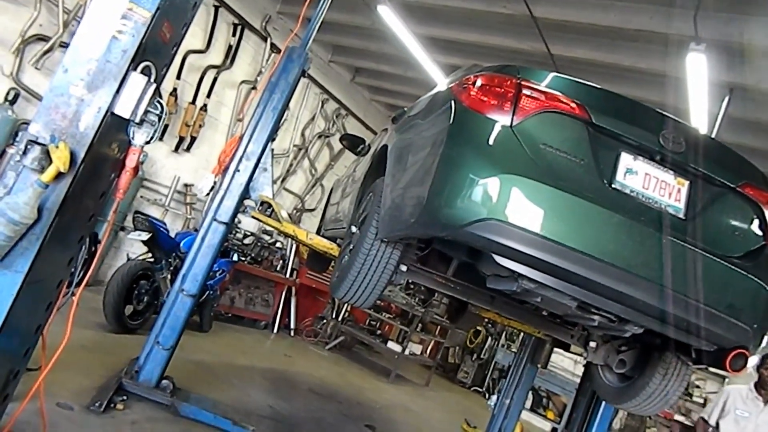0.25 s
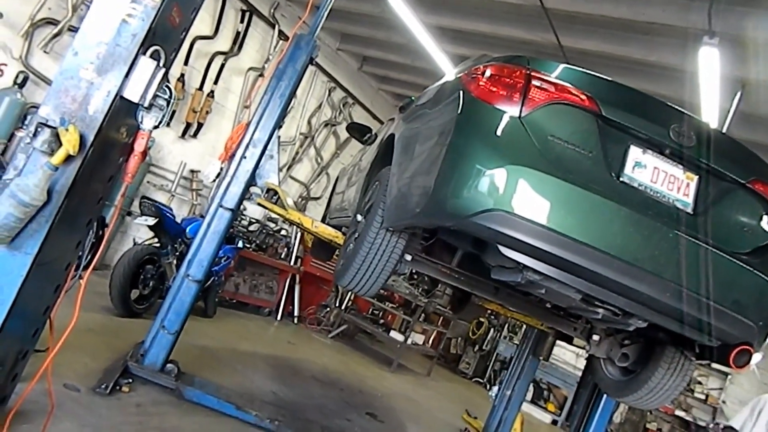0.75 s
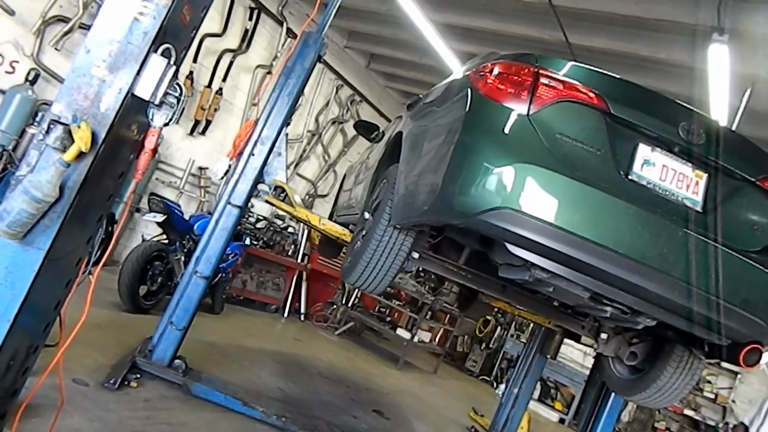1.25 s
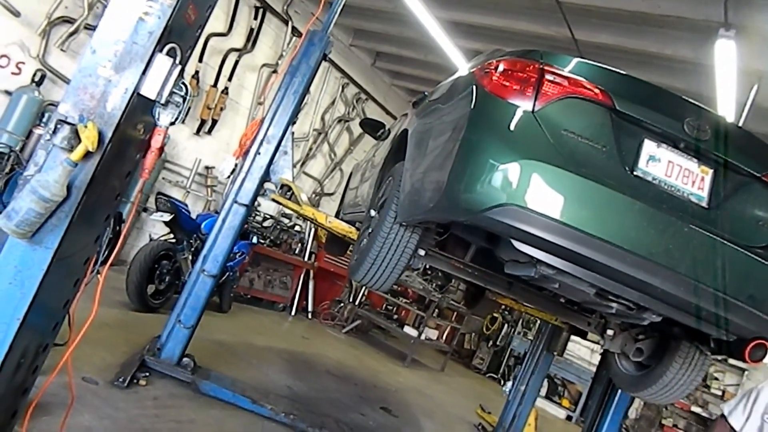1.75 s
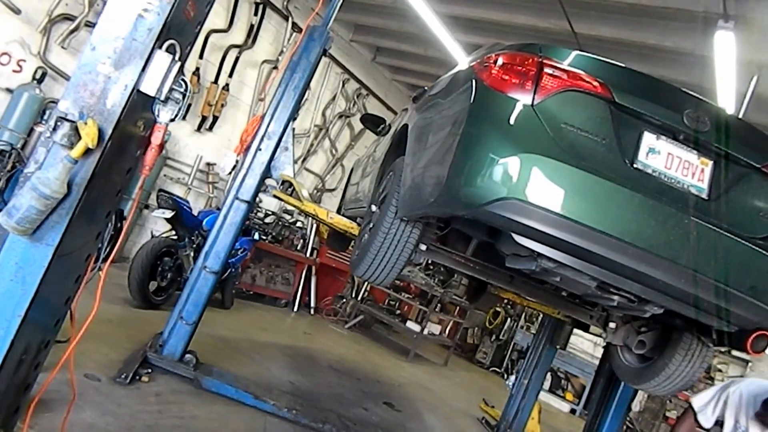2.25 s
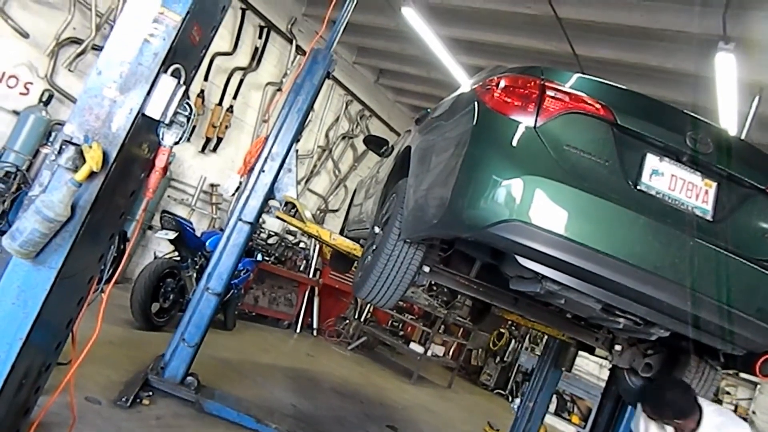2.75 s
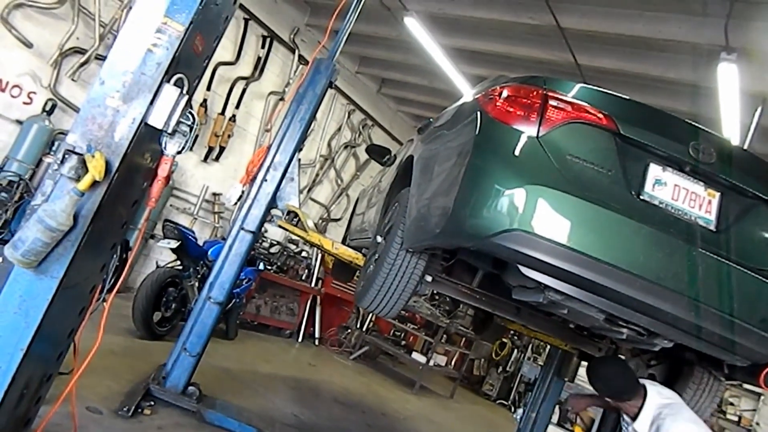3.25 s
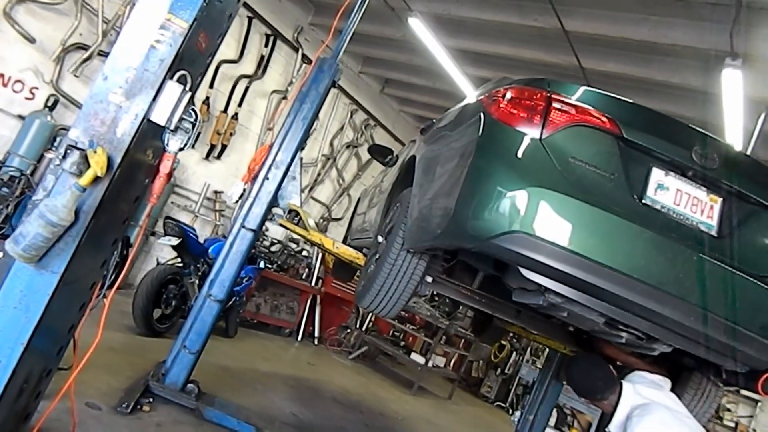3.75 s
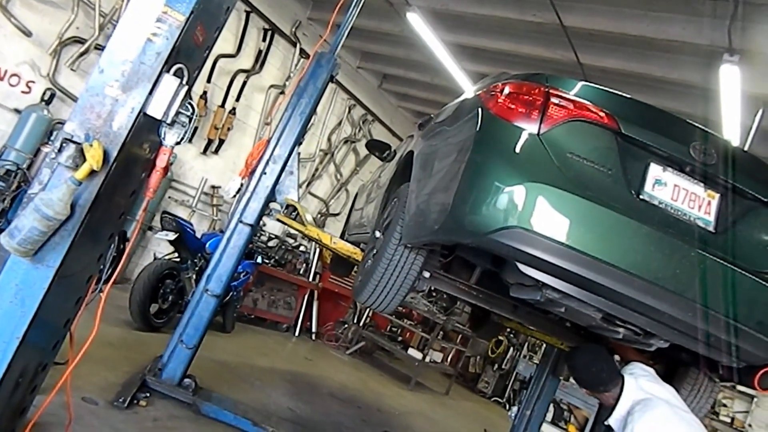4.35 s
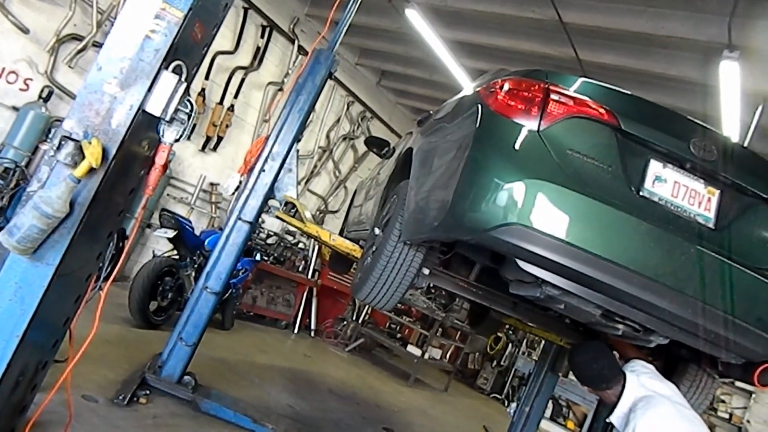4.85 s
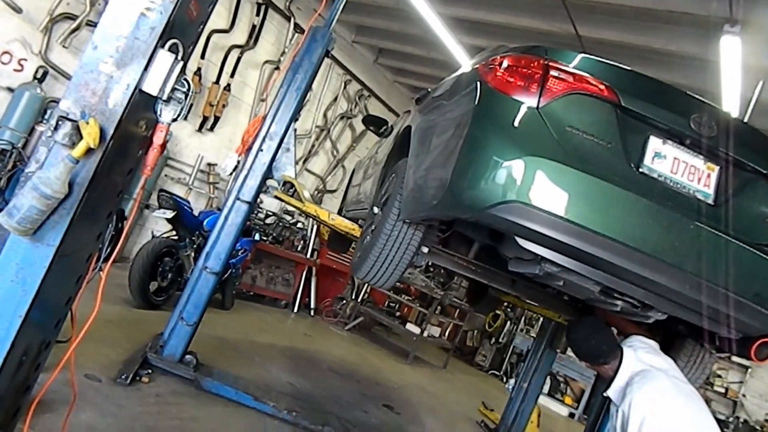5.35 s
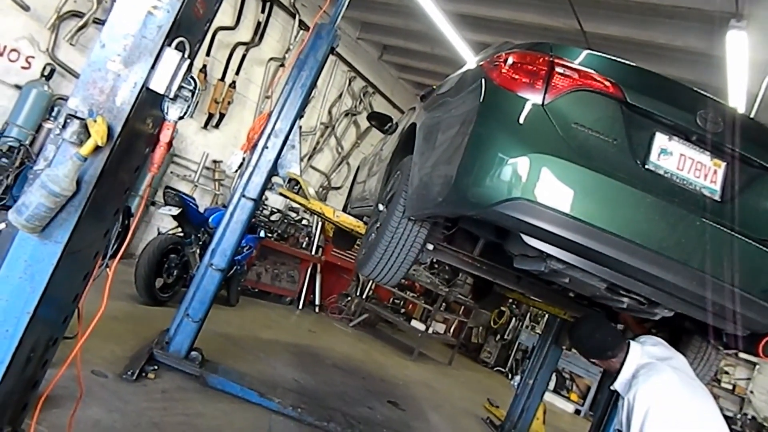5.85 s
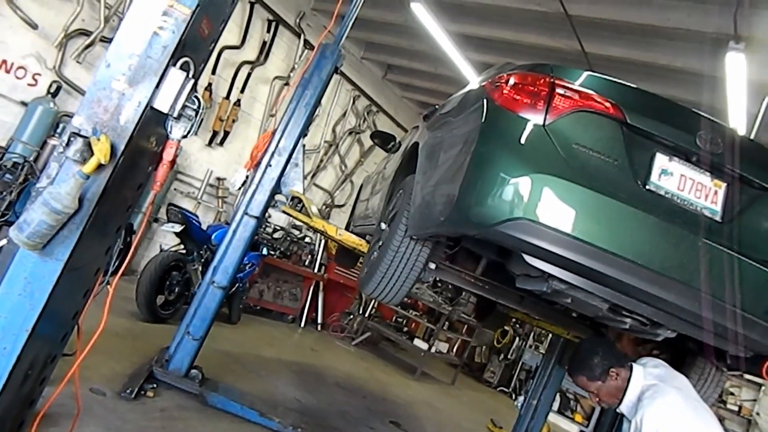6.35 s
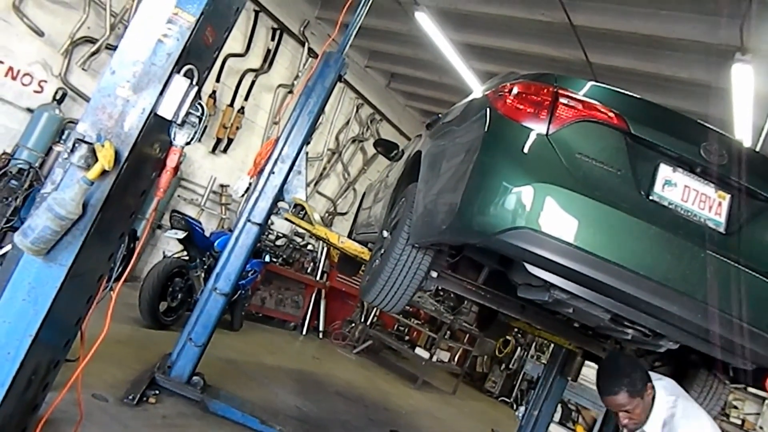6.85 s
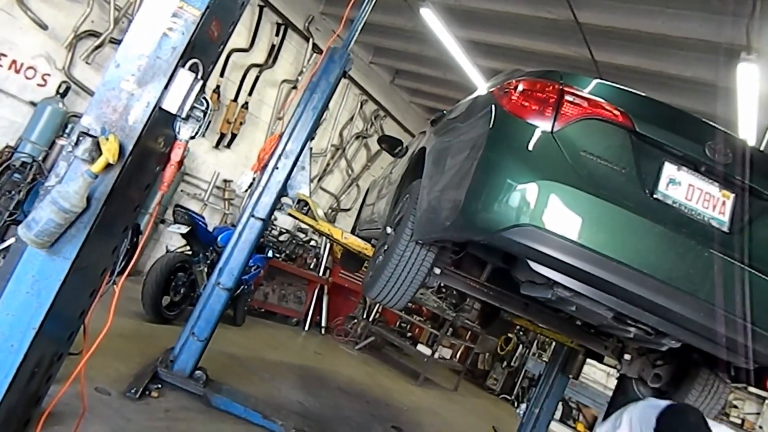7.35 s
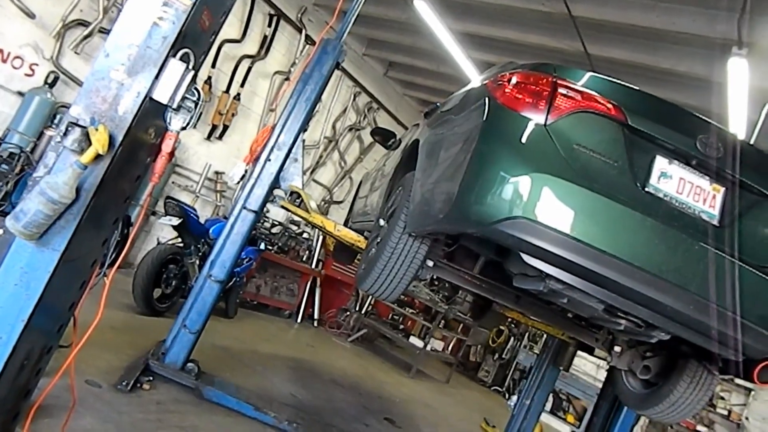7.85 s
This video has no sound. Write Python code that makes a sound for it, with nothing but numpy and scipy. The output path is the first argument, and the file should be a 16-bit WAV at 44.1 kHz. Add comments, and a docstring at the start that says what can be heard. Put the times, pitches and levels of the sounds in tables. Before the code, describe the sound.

Close stereo pickup behind a car on a lift: deep, throbbing, unmuffled idle with low notes swelling in the boom and a breathy rush of escaping gas that eases and bursts back. The idle slows, then recovers somewhat. Finally the engine stumbles, thumps and crackles, revs to over twice its speed with a barking tone, and begins coasting down in the workshop's reverberation.

```python
"""A four-cylinder car on a workshop lift drones through an open exhaust at a raised idle that sinks and recovers.
One cylinder hits hardest: its orders slide through the resonances of pipe and room, excited by firing pulses.
Gas, made of filtered noise, rushes and hisses, eases off and spurts again; low notes swell in the drone.
Near the end the throttle opens: the engine stumbles, thumps and clicks and revs up while the hiss dies away.
With the opposite cylinder now firing almost as hard, it starts to fall back."""
import sys
import numpy as np
from scipy import signal
from scipy.fft import rfft, irfft
from scipy.io import wavfile
from scipy.ndimage import uniform_filter1d, minimum_filter1d

SR = 44100
rng = np.random.default_rng(int(sys.argv[2]) if len(sys.argv) > 2 else 0)


def unload_wav(signal):
    """Save mono or channel-first audio to the path in sys.argv[1] as 16-bit WAV at rate SR, clipped to [-1, 1]."""
    wavfile.write(
        sys.argv[1],
        SR,
        np.round(np.clip(np.atleast_2d(signal).T, -1, 1) * 32767).astype(np.int16),
    )


N = 357246
T = np.arange(N) / SR
HZ = np.fft.rfftfreq(N, 1 / SR)


def amp(db):
    """Logarithmic level: decibels become an amplitude gain."""
    return 10 ** (np.asarray(db) / 20)


def curves(rows):
    """Linear interpolation: each column after the time becomes a curve over time."""
    s, *columns = np.transpose(rows)
    return [np.interp(T, s, column) for column in columns]


def read(points):
    """Logarithmic pitch scale: a table over frequency is joined on a log axis."""
    hz, value = np.transpose(points)
    return np.interp(np.log(HZ + 1), np.log(hz + 1), value)


def ramp(start_s, length_s):
    """Linear transition: rises from 0 to 1."""
    return np.clip((T - start_s) / length_s, 0, 1)


def bell(s, half_length_s):
    """Gaussian envelope: swells to 1 at s and falls to 1/e a half length away."""
    return np.exp(-((T - s) / half_length_s) ** 2)


def swells(rows):
    """Superposition of Gaussian swells: one summed curve for each dB column."""
    return sum(np.outer(db, bell(s, half_length)) for s, half_length, *db in rows)


def unit(x):
    """Normalisation of power: scales to rms 1."""
    return x / np.sqrt(np.mean(x ** 2) + 1e-20)


def held(x, size=6000):
    """Short-time power normalisation: rms stays near 1, but the throb of single firings remains."""
    power = uniform_filter1d(uniform_filter1d(x ** 2, size), size)
    return x / np.sqrt(abs(power) + 1e-20)


def wander(hz):
    """Low-passed random process: slow chance of rms 1, up to about hz."""
    return unit(irfft(rfft(rng.standard_normal(N)) / (1 + (HZ / hz) ** 4), N))


def band(x, lo_hz, hi_hz, order=4):
    """Band-pass filtering: a Butterworth response passes lo_hz to hi_hz."""
    sos = signal.butter(order, [lo_hz, min(hi_hz, .49 * SR)], "band", fs=SR, output="sos")
    return signal.sosfilt(sos, x)


def workshop(x, t60=1.0):
    """Diffuse reverberation: exponentially decaying noise, independent at each microphone."""
    t = np.arange(SR) / SR
    tail = rng.standard_normal((2, SR)) * amp(-60 * t / t60) * (t > .006)
    return signal.fftconvolve(x[None], tail / np.linalg.norm(tail[0]), axes=1)[:, :N]


def rumble():
    """Partly coherent ambient noise: low workshop air, mostly shared by the two microphones."""
    common, left, right = band(rng.standard_normal((3, N)), 53, 91, order=2)
    pair = unit(common + .45 * np.array([left, right]))
    return amp(-34.5) * pair


# Low notes in the drone. Each row: centre in seconds, half length in seconds, pitch in Hz, mean level in dB.
LOW_NOTES = [(0, 0.099, 114, -25), (0.625, 0.075, 145.6, -16), (2.313, 0.6, 121.5, -28),
             (2.892, 0.21, 119.6, -19), (5.503, 0.31, 133.4, -21)]


def hum():
    """Amplitude and phase modulation: sine tones swell, fade and waver a little."""
    drift_rad = 0.72 * wander(0.75)
    notes = np.zeros(N)
    for s, half_length, hz, db in LOW_NOTES:
        notes += amp(db) * bell(s, half_length) * np.sin(2 * np.pi * hz * T + drift_rad)
    return np.sqrt(2) * amp(2.8 * wander(3.1)) * notes  # root 2 brings a sine to rms 1


# Short howls and whistles in the gas stream. Each row: centre in seconds, half length in seconds,
# pitch in Hz, width in Hz, level in dB, left minus right in dB.
WHISTLES = [(3.413, 0.11, 1220, 400, -28, 0), (6.94, 0.032, 2330, 200, -33.5, -6),
            (7.042, 0.037, 2570, 220, -36, -5), (7.3, 0.38, 2510, 450, -43.5, -7),
            (7.55, 0.059, 2600, 500, -44, -8), (7.54, 0.037, 1060, 500, -34, 1)]


def howls():
    """Resonant filtering: noise caught briefly in a resonance is heard as a fuzzy whistle."""
    out = np.zeros((2, N))
    for s, half_length, hz, width, db, pan_db in WHISTLES:
        resonance = 1 / (1 + (2 * (HZ - hz) / width) ** 2)
        tone = unit(irfft(rfft(rng.standard_normal(N)) * resonance, N))
        out += tone * bell(s, half_length) * amp([[db + pan_db / 2], [db - pan_db / 2]])
    return out


# Likeness of the two microphones. Each row: frequency in Hz, coherence 0-1.
COHERENCE = [(300, .98), (1000, .93), (2000, .8), (3000, .55), (4500, .25), (14000, .25)]
# Balance of the two microphones. Each row: frequency in Hz, left minus right in dB.
BALANCE = [(300, 1), (1000, -0.5), (2000, -2), (4000, -6.5), (6500, -8.5), (9000, -2), (13000, 1.5)]


def gas(colour, ripple_db):
    """Partial coherence: turbulent noise with a fixed, randomly rippled spectrum, partly alike at the microphones."""
    a, b = rfft(rng.standard_normal((2, N)))
    ripple = unit(uniform_filter1d(rng.standard_normal(len(HZ)), size=140))
    same, balance_db = read(COHERENCE), read(BALANCE)
    left = a * amp(balance_db / 2)
    right = (same * a + np.sqrt(1 - same ** 2) * b) * amp(-balance_db / 2)
    pair = irfft(np.array([left, right]) * amp(read(colour) + ripple_db * ripple), N)
    return pair / pair.mean(0).std()


def gusty(x, patchy_db):
    """Intermittency of turbulence: eddies swell and fade in patches a few hundred Hz wide."""
    z = signal.stft(x, nperseg=512)[2]
    chance = rng.standard_normal(z.shape[1:])
    patches = unit(uniform_filter1d(uniform_filter1d(chance, size=4, axis=0), size=9, axis=1))
    return signal.istft(z * amp(patchy_db * patches), nperseg=512)[1][:, :N]


# The gas eases off, then breaks out again. Each row: start in seconds, end in seconds, depth for the sizzle in dB.
EASINGS = [(1.4, 1.767, 6), (2.587, 3.65, 12.5), (5.307, 5.76, 14.5)]
EASE_S, BREAK_OUT_S = 0.26, .04
HISS_FOLLOWS = 0.46  # share of the sizzle's dips that the hiss takes
# Spurts of gas. Each row: centre in seconds, half length in seconds, hiss change in dB, sizzle change in dB.
GAS_SPURTS = [(.42, 0.19, 2.5, 6.5), (1.06, .07, 3.5, 0), (1.8, 0.038, -2, 4), (2.03, 0.088, 1, 2.5),
              (2.5, 0.31, 1, 2.5), (3.4, 0.086, 4, -3), (3.68, 0.035, -0.5, 5), (4.03, 0.27, 3.5, 6.5),
              (4.53, 0.11, 4, 6), (4.73, 0.13, 2, 2.5), (5.17, 0.11, 4.5, 6.5), (5.8, 0.054, -0.5, 10),
              (6.16, 0.099, 2, 4.5), (7.9, 0.18, 5.5, 10)]
# The hiss dies away after the throttle opens: delay in seconds, time constant in seconds,
# final hiss change in dB, final sizzle change in dB.
FADE_UNDER_THROTTLE = (0.11, 0.17, -16.5, -25)
HISS_DB, SIZZLE_DB = -32.5, -45.5  # escaping gas at idle


def flow():
    """Modulated flow noise: hiss and sizzle dB are steady but for lulls and spurts, then decay away."""
    lull_db = np.zeros(N)
    for start, end, depth in EASINGS:
        lull_db += depth * ramp(start, EASE_S) * (1 - ramp(end - BREAK_OUT_S / 2, BREAK_OUT_S))
    hiss_db, sizzle_db = swells(GAS_SPURTS)
    delay, fade, hiss_drop_db, sizzle_drop_db = FADE_UNDER_THROTTLE
    gone = 1 - np.exp(-np.maximum(T - OPEN_S - delay, 0) / fade)
    return (HISS_DB + hiss_db - HISS_FOLLOWS * lull_db + hiss_drop_db * gone,
            SIZZLE_DB + sizzle_db - lull_db + sizzle_drop_db * gone)


# Spectra of the three gas noises. Each row: frequency in Hz, relative spectral level in dB.
ROAR_COLOUR = [(150, -12), (280, 0), (400, 1), (580, -1), (800, -1), (1000, 0), (1250, -2), (1500, -9.5),
               (1900, -8), (2600, -18), (3600, -25), (6000, -50), (12000, -92)]
HISS_COLOUR = [(700, -24), (1500, 9), (2200, 4.5), (3000, 1.5), (4200, -2.5), (6500, -4.5), (8000, -9.5),
               (10000, -14.5), (14000, -47)]
SIZZLE_COLOUR = [(5000, -9.5), (7500, 2.5), (9000, 4), (11800, 5.5), (12800, -1.5), (13800, -6),
                 (14600, -17)]


def rush(pulses):
    """Pulsating jet noise: gas leaves in puffs as a roar, and a hiss and fine sizzle that flutter together."""
    _, _, roar_db = blast()
    hiss_db, sizzle_db = flow()
    puffs = unit(band(abs(pulses), 18, 160, order=1))
    roar_gain = amp(roar_db + 2.1 + .5 * puffs + .5 * wander(25))
    roar = gusty(gas(ROAR_COLOUR, ripple_db=2.5), patchy_db=1.5) * roar_gain
    flutter_db = 0.44 * puffs + 0.44 * wander(23)
    hiss = gusty(gas(HISS_COLOUR, ripple_db=1.7), patchy_db=1.2) * amp(hiss_db + flutter_db)
    sizzle = gusty(gas(SIZZLE_COLOUR, ripple_db=-1.0), patchy_db=2.0) * amp(sizzle_db + flutter_db)
    return roar * np.sqrt(1 - growl_share()) + hiss + sizzle


# Thumps and overload clicks. Each row: time in seconds, low thump peak in dB, click peak in dB.
THUMPS_AND_CLICKS = [(6.91, -11, -30), (6.954, -9, -15), (6.993, -14, -22), (7.032, -10, -22),
                     (7.062, -8, -30), (7.2, -15, -34), (7.226, -11, -28), (7.251, -11, -26),
                     (7.275, -13, -4), (7.299, -14, -2.5), (7.363, -22, -3.5), (7.383, -20, -9),
                     (7.41, -15, -28), (7.463, -26, -7), (7.898, -14, -5), (7.968, -22, -14)]


def thumps(thump_hz=92, length_s=0.012, click_s=.0003):
    """Transients: short low thumps of the stumbling engine, some topped by a sharp click from overloaded peaks."""
    t, out = np.arange(-2000, 2000) / SR, np.zeros(N)
    thump = np.cos(2 * np.pi * thump_hz * t) * np.exp(-(t / length_s) ** 2)
    click = (1 - abs(t) / click_s / 2) * np.exp(-abs(t) / click_s)
    for s, thump_db, click_db in THUMPS_AND_CLICKS:
        part = out[round((s + t[0]) * SR):][:len(t)]
        part += (amp(thump_db) * thump + amp(click_db) * click)[:len(part)]
    return out + amp(-15.5) * workshop(out)


# The wandering idle. Each row: time in seconds, speed in four-stroke cycles a second.
IDLE_SPEED = [(0, 23.8), (.54, 24.3), (1.54, 24.6), (1.94, 25), (2.36, 24.35), (2.86, 19.8), (3.49, 20),
              (3.8, 19.15), (4.14, 19.25), (4.74, 21), (5.14, 22.5), (5.54, 22.3), (6.54, 20.85), (6.8, 21)]
# One blip of the throttle: it opens, the speed climbs to its top, hangs there and coasts down.
OPEN_S, TOP_S, SHUT_S = 6.84, 7.48, 7.55
TOP_SPEED, COAST_S = 52, 1.24  # cycles a second, time constant in seconds


def engine_speed():
    """Rotational inertia: cycles a second idle, climb steadily under throttle and coast down exponentially."""
    idle, = curves(IDLE_SPEED)
    blip = ramp(OPEN_S, TOP_S - OPEN_S) * np.exp(-np.maximum(T - SHUT_S, 0) / COAST_S)
    return idle + (TOP_SPEED - idle) * blip


# How unevenly it fires at idle. Each row: time in seconds, unevenness 0-1.
IDLE_UNEVENNESS = [(0, 0.46), (1.1, 0.41), (1.6, 0.19), (2.2, 0.17), (2.7, 0.52), (3.2, 0.28), (5.4, 0.21),
                   (6.7, 0.16)]
STUMBLE = 0.38  # unevenness added while the throttle is open


def unevenness(onset_s=.1, settle_s=0.65):
    """Cycle-to-cycle variation: the engine stumbles under throttle and settles once it is up to speed."""
    idle, = curves(IDLE_UNEVENNESS)
    return idle + STUMBLE * (ramp(OPEN_S, onset_s) - ramp(TOP_S, settle_s))


OPPOSITE_IDLE, OPPOSITE_COAST = 0.085, 0.92  # the cylinder opposite the strong one, relative to it


def firings(jitter=0.032, weak=0.023, even_out_s=0.28):
    """Engine-order excitation: one pulse a firing from a strong cylinder, its opposite and two weak ones."""
    uneven = unevenness()
    opposite = OPPOSITE_IDLE + (OPPOSITE_COAST - OPPOSITE_IDLE) * ramp(TOP_S, even_out_s)
    cycles = np.cumsum(engine_speed()) / SR + jitter * uneven * wander(30)
    count = np.maximum.accumulate(np.floor(4 * cycles))  # never counts back
    at = np.flatnonzero(np.diff(count))
    chance = rng.standard_normal(2000)[:len(at)]
    cylinder = np.mod(count[at], 4)
    strength = np.select([cylinder == 0, cylinder == 2], [1, opposite[at]], weak)
    pulses = np.zeros(N)
    pulses[at] = strength + .5 * uneven[at] * chance
    return pulses


# Level of the low boom before its surges. Each row: time in seconds, level in dB.
BOOM_CURVE = [(0.0, -20), (0.25, -14), (0.47, -19.5), (0.61, -15.5), (0.79, -18), (2.3, -12), (2.57, -19.5),
              (2.84, -16), (3.09, -18.5), (4.24, -11), (4.37, -15), (4.85, -9), (4.92, -11), (6.75, -11),
              (6.88, -8.5), (6.97, -13), (8.03, -17.5), (8.1, -19)]
# The blast chokes or surges. Each row: centre in seconds, half length in seconds,
# boom change in dB, bark change in dB, roar change in dB.
BLAST_SURGES = [(1.12, 0.046, -6.5, -4, 1), (1.7, 1, 1, 1, 1.06), (2.95, 0.11, -2, 0.5, -2.5),
                (4.47, 0.078, 0.5, 7, 1.5), (4.92, 0.051, 0, -3, -3), (5.75, 0.32, -0.5, -0.5, -1.2),
                (6.94, .05, 1, 9.5, 1), (7.15, .11, -0.5, 0.5, -8), (7.31, 0.034, 0.5, -4, -4.5),
                (7.44, .05, 0.5, 1, -1), (7.55, 0.11, 0.5, -2, 6.5), (7.89, 0.051, 4, 4, 4),
                (8.08, 0.17, 2, 4, -2)]
BARK_IDLE_DB, BARK_REVVED_DB = -32.5, -13  # the pipe's hard bark
ROAR_REFERENCE_DB = -28  # steady; roar and growl are set a few dB above it


def blast(idle_speed=26, revved_speed=47):
    """Speed-dependent radiation: boom, bark and roar in dB; the bark hardens with speed, all three surge."""
    boom_db, bark_db, roar_db = swells(BLAST_SURGES)
    hard_db = np.interp(engine_speed(), [idle_speed, revved_speed], [BARK_IDLE_DB, BARK_REVVED_DB])
    return curves(BOOM_CURVE)[0] + boom_db, hard_db + bark_db, ROAR_REFERENCE_DB + roar_db


def growl_share(idle=0.061, revved=0.5):
    """Division of power: the faster the engine, the more of the roar rings in the pipe's high modes."""
    return np.clip(np.interp(engine_speed(), [24, 42], [idle, revved]), .01, .95)


def smear(x, low_s=0.03004, corner_hz=170):
    """Dispersion: the pipe holds low notes back longer than high ones, so each firing is drawn out."""
    delay_s = abs(low_s) / (1 + (HZ / corner_hz) ** 4)
    phase = 2 * np.pi * np.cumsum(delay_s) * HZ[1]  # group delay summed over frequency
    return irfft(rfft(x) * np.exp(-1j * phase), N)


def ring(x, modes):
    """Modal superposition: the drive rings a set of fixed damped resonances."""
    out = np.zeros(N)
    for hz, width, db, polarity in modes:
        r, angle = np.exp(-np.pi * abs(width) / SR), 2 * np.pi * hz / SR
        mode = signal.lfilter([1 - r, 0, r - 1], [1, -2 * r * np.cos(angle), r * r], x)
        out += np.sign(polarity) * amp(db) * mode
    return out


# Low modes of pipe and room, middle pipe modes, and high pipe modes that growl at speed.
# Each row: frequency in Hz, width in Hz, level within its set in dB, polarity (sign) at the microphone.
LOW_MODES = [(67.7, 2, -14.5, 1.0), (79.9, 6.8, -5.5, -1.0), (93.9, 12.2, -8.5, -1.0),
             (110.7, 20.3, -0.9, -1.0), (119.8, 21.4, 1, 1.0), (118.84, 1.54, 4, -1.0),
             (130.4, 7.3, 3.5, -1.0), (151.95, 2.8, 1, 1.0), (154.2, 5.3, -2, 1.0), (173.97, 4, 6.5, 1.0),
             (210.1, 2.68, 10.5, 1.0), (220.5, 2, -4, 1.0), (283, 2.56, 2.5, 1.0)]
MIDDLE_MODES = [(275, 28, -9.5, 1), (285, 15, 2.5, 1), (318, 26, -5, -1), (337.1, 10.4, 1, 1),
                (382.4, 18, -10.5, -1), (399.2, 7.8, -3.5, -1), (462.6, 2.36, 4, 1), (520, 21, -11.5, -1),
                (545, 27, -13.5, 1), (597, 12, -17.5, -1)]
HIGH_MODES = [(664, 2.7, 5, 1), (717, 23, -7, -1), (787, 15, -6.5, 1), (809, 7.1, -1.5, -1),
              (866, 6.8, -1.5, 1), (929, 11, -3.5, 1), (1024, 13, -9.5, -1), (1072, 11, -8, -1),
              (1148, 32, -14, 1), (1310, 3.1, -8, 1)]


def exhaust(pulses):
    """Forced resonance: firings and turbulence ring pipe and room; uneven firing churns the gas more."""
    boom_db, bark_db, roar_db = blast()
    drive = smear(held(pulses))
    low, middle, high = drive + 1.2 * unevenness() * rng.standard_normal((3, N))
    boom = amp(boom_db) * held(band(ring(low, LOW_MODES), 53.4, 348))
    bark = amp(bark_db) * held(band(ring(middle, MIDDLE_MODES), 212.6, 770))
    high = high + .5 * rng.standard_normal(N)
    growl_gain = amp(roar_db + 4.0) * np.sqrt(growl_share())
    growl = growl_gain * held(band(ring(high, HIGH_MODES), 648, 1450))
    echo = amp(-23) * workshop(boom) + amp(-19) * workshop(bark + growl)
    return (boom + bark + growl) * amp([[-.15], [.15]]) + echo


def scene():
    """Superposition and arrival-time difference: all sources, heard from behind the car, reach the right first."""
    pulses = firings()
    left, right = rumble() + hum() + howls() + rush(pulses) + thumps() + exhaust(pulses)
    return np.array([np.r_[np.zeros(3), left[:-3]], right])  # left lags by 3 samples


def record(dry):
    """Peak limiting and band limiting: a fast gain holds down the loudest peaks, then the treble is cut."""
    room = np.minimum(1, .98 / (abs(dry).max(0) + 1e-9))
    gain = uniform_filter1d(uniform_filter1d(minimum_filter1d(room, size=161), size=81), size=81)
    lowpass = signal.firwin(511, 14500, window=("kaiser", 9), fs=SR)  # cutoff in Hz
    return signal.oaconvolve(dry * gain, lowpass[None], "same")


dry = scene()
out = record(dry)
unload_wav(out)
```